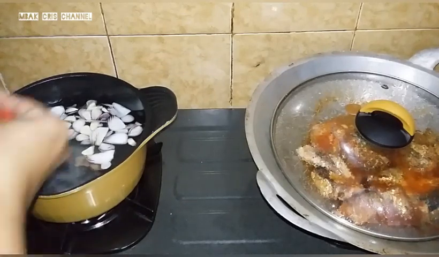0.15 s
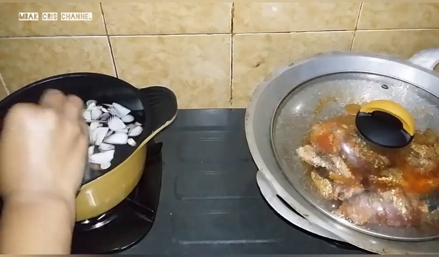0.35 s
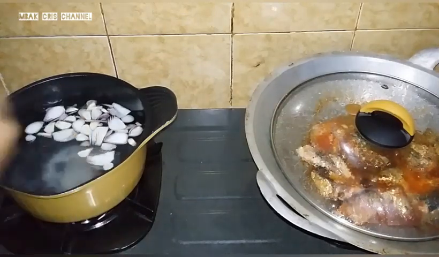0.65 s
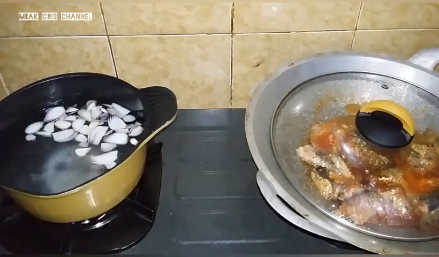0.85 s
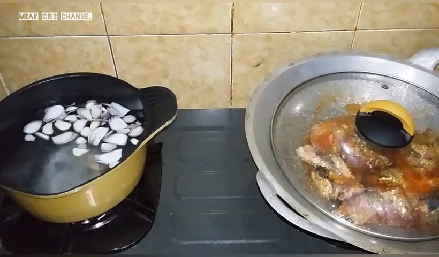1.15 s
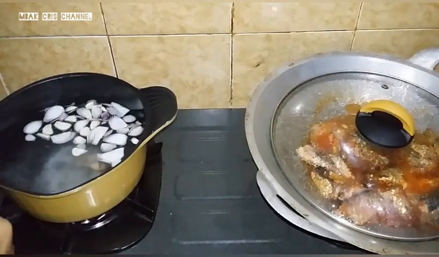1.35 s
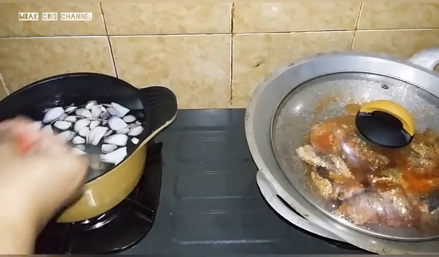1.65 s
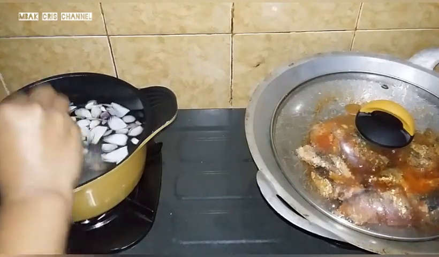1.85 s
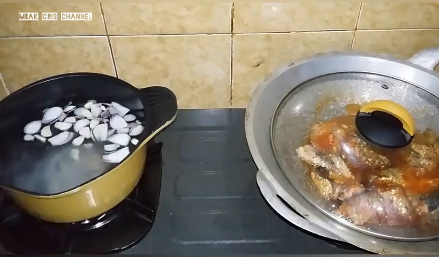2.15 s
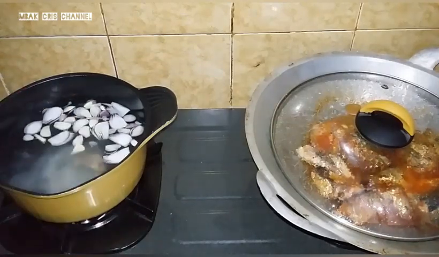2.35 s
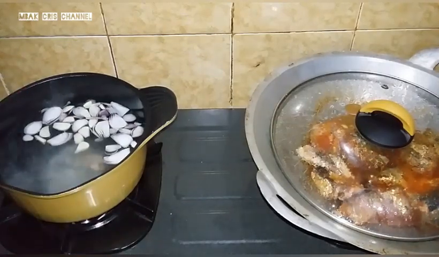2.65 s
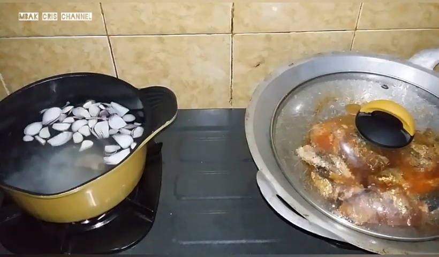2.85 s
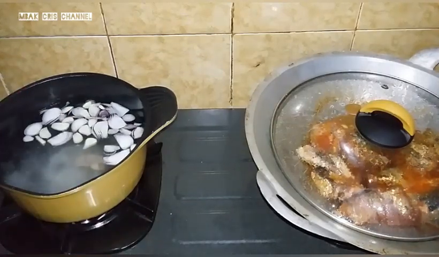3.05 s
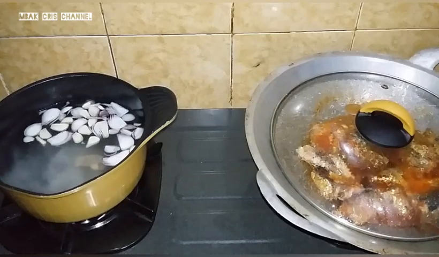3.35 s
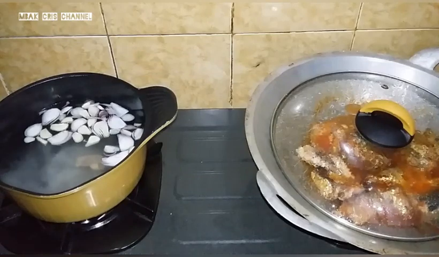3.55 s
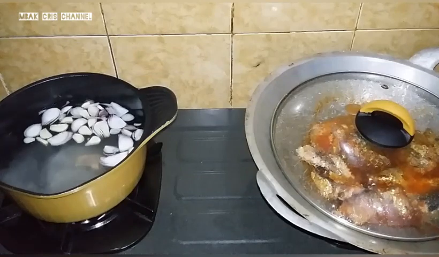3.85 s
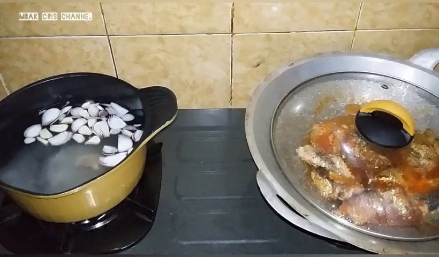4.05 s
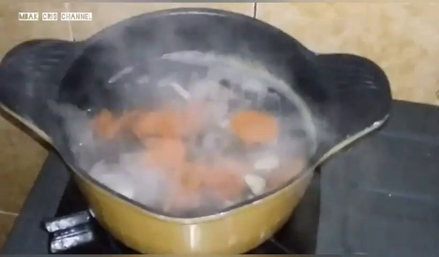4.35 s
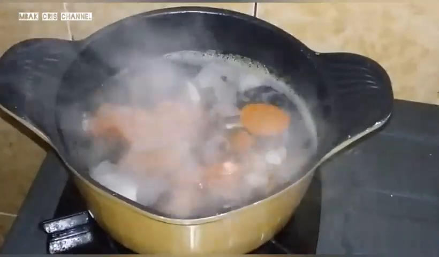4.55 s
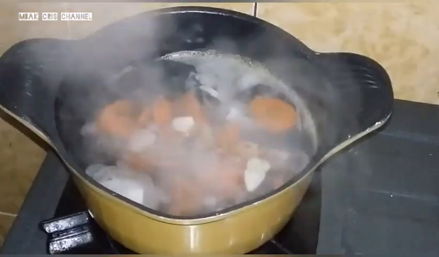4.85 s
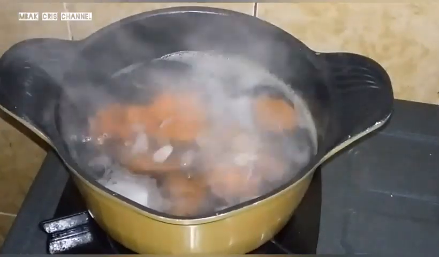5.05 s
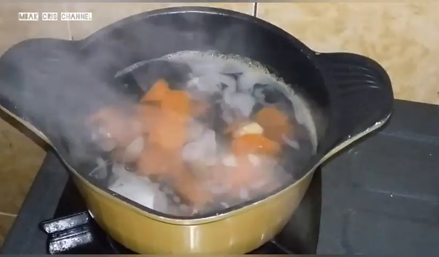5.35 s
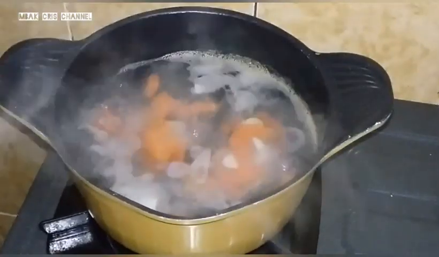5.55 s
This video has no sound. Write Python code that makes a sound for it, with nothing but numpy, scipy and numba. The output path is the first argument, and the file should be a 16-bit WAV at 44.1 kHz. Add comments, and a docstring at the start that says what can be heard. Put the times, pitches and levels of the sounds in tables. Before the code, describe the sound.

In a home kitchen, a lidded pan fries with a dense bright sizzle, low bubbling drone and sharp oil spits. A hand clatters at the neighbouring pot, most busily midway. A fluttering steam jet bursts out and everything cuts to silence. A much fainter simmer fades in, then something scrapes and knocks on the counter. One close microphone, mono, slightly dull at the very top.

```python
"""A dense frying sizzle over the drone of pan and glass lid, with spits of oil, a hand clattering at the
next pot and a rising jet of steam; it cuts to silence. Then a simmering pot fades in, a faint hiss, until
something is dragged and knocked down on the counter. Coloured noise bands and sliding damped sines make
the liquids and the drag; banks of decaying modes make the blows; a thin whine sits at the very top."""
import sys
import numpy as np
from scipy import signal
from scipy.fft import rfft, irfft, next_fast_len
from scipy.io import wavfile
from scipy.ndimage import uniform_filter1d
from numba import njit

SR = 44100
rng = np.random.default_rng(int(sys.argv[2]) if len(sys.argv) > 2 else 0)


def generate_wav(signal):
    """Clip the signal to [-1, 1] and save it as 16-bit WAV at the path in sys.argv[1]."""
    frames = np.transpose(np.atleast_2d(signal))
    scaled = np.clip(frames, -1, 1) * 32767
    pcm = np.round(scaled).astype(np.int16)
    wavfile.write(sys.argv[1], SR, pcm)


N = 251057
TIME = np.arange(N) / SR
SIZE = next_fast_len(N)
FREQ = np.arange(SIZE // 2 + 1) * SR / SIZE + 1e-3  # Hz, offset so that log is finite


def undb(db):
    """Decibels to gain."""
    return 10 ** (np.asarray(db, float) / 20)


def unit(x):
    """Scale to rms 1."""
    return x / np.sqrt(np.mean(x ** 2))


def walk(rate_hz):
    """Random levels held 1 / rate_hz seconds and slewed twice; rms 1."""
    hold = max(int(SR / rate_hz), 1)
    steps = np.repeat(rng.standard_normal(N // hold + 1), hold)
    slewed = uniform_filter1d(uniform_filter1d(steps, hold), hold)
    return unit(slewed[:N])


def ramp(start_s, length_s):
    """0 before start_s, then a straight rise to 1 over length_s."""
    return np.clip((TIME - start_s) / length_s, 0, 1)


def filtered(x, gain):
    """Apply a gain per frequency."""
    return irfft(rfft(x, SIZE) * gain, SIZE)[:N]


def colour(points, peaks=()):
    """Gain at every frequency from (Hz, dB) points, lifted by resonances (Hz, width Hz, dB)."""
    hz, db = np.transpose(points)
    lift = 1
    for peak_hz, width_hz, peak_db in peaks:
        lift = lift + undb(peak_db) ** 2 / (1 + (2 * (FREQ - peak_hz) / width_hz) ** 2)
    return undb(np.interp(np.log(FREQ), np.log(hz), db, -90, -90)) * np.sqrt(lift)


def hiss(gain, swell_db=0., patch_db=0., patch_rate_hz=30.):
    """Half-octave-spaced noise bands that swell together, in patches shared with their neighbours; rms 1."""
    out, swell = np.zeros(N), swell_db * walk(7.5)
    shared = walk(patch_rate_hz)
    for centre_hz in 21 * 2 ** np.arange(0, 10.1, .5):
        band = gain * np.cos(np.pi * np.clip(np.log2(FREQ / centre_hz), -.5, .5))
        if band.max() > 1e-3:  # skip inaudible bands
            shared = (shared + walk(patch_rate_hz)) / np.sqrt(2)
            out += undb(swell + patch_db * shared) * filtered(rng.standard_normal(N), band)
    return unit(out)


@njit
def burst(start, hz, cycles, size, glide, count):
    """Each bubble is a damped sine that slides up in pitch as it nears the surface."""
    out = np.zeros(count)
    for k in range(len(start)):
        span = cycles[k] * SR / hz[k]  # samples
        z = size[k] + 0j
        step = np.exp(2j * np.pi * hz[k] / SR - 3 / span)
        bend = np.exp(2j * np.pi * hz[k] / SR * glide / span)
        for i in range(start[k], min(start[k] + int(span), count)):
            out[i] += z.imag
            z, step = z * step, step * bend
    return out


def bubbles(gain, rate_hz, lo_hz, hi_hz, mean_cycles, spread_db, glide):
    """Bubbles of random pitch, length and capped level at random moments, in their vessel's colour; rms 1."""
    moment, pitch, level, length = rng.random((int(rate_hz * N / SR), 4)).T
    hz = lo_hz * (hi_hz / lo_hz) ** pitch
    # factor hz: equal energy per hertz before colouring
    size = hz * undb(spread_db * np.minimum(-np.log(1 - level), 3))
    start = (moment * N).astype(np.int64)
    raw = burst(start, hz, mean_cycles * (.5 + length), size, glide, N)
    return unit(filtered(raw, gain))


def ring(hits, modes, detune, sag=0., sag_s=.03):
    """Each blow rings the modes near its pitch most; a softer contact rings fewer and builds more slowly.
    A loose panel (sag > 0) drops in pitch under a hard blow and climbs back."""
    reach_octaves, reach_slope = 0.2, 0.38  # spread of modes at a 10 ms push; a shorter push rings more
    out, t = np.zeros(N + SR), np.arange(SR // 2) / SR
    chance = rng.standard_normal((len(hits), len(modes)))
    for (start_s, peak_db, hit_hz, push_s, stretch), slips in zip(hits, chance):
        sound = 0
        reach = reach_octaves * (100 * push_s) ** -reach_slope
        bent = t - sag * undb(peak_db) * sag_s * (1 - np.exp(-t / sag_s))
        for (mode_hz, mode_db, t60_s), slip in zip(modes, slips):
            near = np.exp(-.5 * (np.log2(mode_hz / hit_hz) / reach) ** 2)
            tone = np.sin(2 * np.pi * mode_hz * (1 + detune * slip) * bent)
            sound = sound + near * undb(mode_db) * tone * 1000 ** (-t / t60_s / stretch)
        sound = sound * np.sin(np.pi / 2 * np.minimum(t / push_s, 1)) ** 2
        i = int(start_s * SR)
        out[i:i + len(t)] += undb(peak_db) * sound / np.abs(sound).max()
    return out[:N]


def whine():
    """A thin steady band of noise at the very top."""
    centre_hz, width_hz, level_db = 15600, 132, -68.5
    band = 1 / (1 + (2 * (FREQ - centre_hz) / width_hz) ** 2)
    return undb(level_db) * unit(filtered(rng.standard_normal(N), band))


def simmer():
    """Water simmering further off: a smooth hiss over a wavering low murmur of bubbles."""
    # Each row: frequency in Hz, relative level in dB per Hz.
    simmer_colour = [(18, -42), (42, -18), (56, -0.5), (75, -6.5), (105, -3.5), (150, -1.5), (190, -7),
                     (235, 1.5), (290, 0), (360, -6.5), (500, -7), (780, -12.5), (1200, -15), (3500, -18.5),
                     (5200, -18), (6400, -15), (7500, -18), (10000, -27.5), (15900, -31.5)]
    level_db = -43
    tone = colour(simmer_colour)
    murmur = bubbles(tone, rate_hz=110., lo_hz=101., hi_hz=694., mean_cycles=14., spread_db=-2., glide=.054)
    steam = hiss(tone, patch_db=.3, patch_rate_hz=25.)
    return undb(level_db) * (steam + undb(-19.0) * murmur)


def shoves(column, dies_s, t60_s):
    """Gain of one layer: each shove along the counter builds, dies quickly and leaves an echo."""
    # Each row: start in seconds, rise in seconds, rasp level in dB, rumble level in dB.
    shove_rows = [(5.27, .03, -50.5, -46), (5.465, 0.0023, -28.5, -33), (5.478, 0.0029, -22.5, -32.5),
                  (5.490, 0.019, -27.5, -33), (5.503, 0.017, -19.5, -27.5), (5.511, .005, -26, -35)]
    echo_db = -5  # the kitchen rings on
    power = 0
    for row in shove_rows:
        start_s, rise_s = row[:2]
        after = np.maximum(TIME - start_s - rise_s, 0)
        tail = np.exp(-2 * after / dies_s) + undb(echo_db) ** 2 * 1000 ** (-2 * after / t60_s)
        power = power + (undb(row[column]) * ramp(start_s, rise_s)) ** 2 * tail
    return np.sqrt(power)


def drag():
    """Something dragged on the counter: gritty rasp of noise and short bursts over a low rumble."""
    # Rasp, then rumble. Each row: frequency in Hz, relative level in dB per Hz.
    rasp_colour = [(710, -25), (1200, -14), (1250, -7), (1340, -7), (1490, -16), (2370, 0), (2550, -4.5),
                   (3600, -5.5), (5730, 1.5), (7660, -4), (15800, -30)]
    rumble_colour = [(30, -45), (70, -20), (130, -20), (230, -10), (330, -11.5), (520, -10), (860, -12.5),
                     (1200, -19), (1600, -17), (2100, -26)]
    tone = colour(rasp_colour)
    grit = bubbles(tone, rate_hz=900., lo_hz=1200., hi_hz=15900., mean_cycles=2.4, spread_db=4., glide=0.)
    rasp = hiss(tone, patch_db=1.0, patch_rate_hz=99.0) + undb(-16.0) * grit
    rumble = hiss(colour(rumble_colour), patch_db=1.0, patch_rate_hz=56.0)
    rasp_gain = shoves(column=2, dies_s=0.025, t60_s=0.37)
    rumble_gain = shoves(column=3, dies_s=0.046, t60_s=0.59)
    return rasp_gain * rasp + rumble_gain * rumble


def knock():
    """Blows that ring the modes of the counter, a loose panel."""
    # Each row: start in seconds, peak in dB, pitch most excited in Hz, push in seconds,
    # ring length as a multiple of each mode's t60 (under 1 damped, over 1 longer).
    blow_rows = [(5.295, -38, 298, .01, .9), (5.322, -37, 300, 0.0077, .9), (5.382, -33, 289, 0.011, 1.1),
                 (5.468, -23, 550, 0.013, 0.84), (5.483, -13, 220, 0.02, 0.35),
                 (5.490, -29, 517, 0.013, 1.1), (5.512, -18, 940, 0.0043, 1.1),
                 (5.520, -13, 215, 0.011, .9), (5.526, -23, 500, 0.0082, 0.97),
                 (5.549, -28, 245, 0.011, 0.46), (5.558, -31, 510, .006, 0.84), (5.559, -30, 870, .006, .8),
                 (5.574, -26.5, 240, 0.016, 1.3), (5.582, -39, 520, .005, .7),
                 (5.600, -28, 232, 0.023, 0.9), (5.652, -31.5, 250, 0.016, .5)]
    # Each row: mode in Hz, relative level in dB, t60 in seconds before that multiple.
    counter_modes = [(238.8, 0.5, 0.17), (288, 0.5, .07), (481, -5, 0.27), (519, -3, 0.23), (550, -4, 0.14),
                     (718, -7, 0.19), (860, -5.5, 0.17), (998, -8, 0.13), (1200, -2, 0.21), (1330, -9, .12)]
    return ring(blow_rows, counter_modes, detune=0.0074, sag=0.24, sag_s=0.046)


def clatter():
    """Hand and cup against the next pot, ringing its modes."""
    # Each row: start in seconds, peak in dB, pitch most excited in Hz, push in seconds,
    # ring length as a multiple of each mode's t60 (under 1 damped, over 1 longer).
    clatter_rows = [(.28, -32.5, 945, 0.037, 1.1), (.33, -30.5, 1080, 0.025, 1),
                    (.55, -38, 295, 0.066, 2.3), (.63, -33, 293, 0.058, 1.3),
                    (1.703, -29.5, 370, 0.013, .9), (1.84, -38, 170, .045, 1.7),
                    (2.210, -23, 870, 0.0027, 1.1), (2.226, -24, 1020, .0056, 1.4),
                    (2.238, -29, 855, .005, 0.8), (2.252, -29, 836, 0.0067, 1.1),
                    (2.266, -30, 480, 0.0043, 0.74), (2.305, -33, 690, .008, .9),
                    (2.320, -30, 720, .006, 0.61), (2.509, -28.5, 860, .006, 0.62),
                    (2.5595, -15, 860, 0.0026, .22), (2.567, -28, 430, .003, 0.49),
                    (2.571, -24, 950, .003, 0.27), (2.581, -22, 910, 0.006, 0.37),
                    (2.592, -24, 506, 0.0053, 0.44), (2.597, -13, 554, .011, 0.59),
                    (2.612, -17, 600, .003, 0.63), (2.626, -16, 460, 0.003, 0.84),
                    (2.630, -19, 398, .002, 0.36), (2.636, -24, 300, 0.0069, 1.5),
                    (2.648, -18, 423, 0.001, 0.49), (2.665, -23, 474, .005, 0.56),
                    (2.682, -27, 450, .004, 0.82), (2.731, -31.5, 830, .01, 0.55),
                    (2.79, -26.5, 826, .012, .7), (2.855, -26.5, 800, .015, 1.3),
                    (2.956, -27, 295, 0.008, 0.56), (3.098, -29, 296, .011, 0.67),
                    (3.222, -25, 804, 0.014, 0.88), (3.31, -27, 505, 0.011, 0.45),
                    (3.44, -27.5, 317, .009, 0.56)]
    # Each row: mode in Hz, relative level in dB, t60 in seconds before that multiple.
    pot_modes = [(168.5, 4, 0.089), (292.2, -3.5, 0.11), (360.5, -6, 0.16), (463, 5, 0.066),
                 (510, -3, 0.063), (579, 5.5, 0.084), (646, 4.5, 0.048), (839, 2, 0.057), (947, -3, 0.09),
                 (1060, 5.5, 0.041), (1305, 2, 0.085)]
    return ring(clatter_rows, pot_modes, detune=0.009)


def jet(width_hz=1100.0, flutter_db=2.1):
    """Steam noise in a narrow band whose centre climbs as the gap closes; it flutters and comes in puffs."""
    # Each row: centre in seconds, lift in dB.
    puff_rows = [(3.918, 5.5), (3.947, 0), (3.96, 5), (3.999, 4), (4.017, 9), (4.045, 15.5), (4.059, 6),
                 (4.075, 10.5), (4.088, 6), (4.118, 10), (4.135, 12), (4.146, 10), (4.166, -8)]
    puff_s = 0.0018
    start_s, rise_s, level_db = 3.89, 0.031, -37.5
    from_hz, to_hz, climb_s = 5600., 6840, 0.18
    soft = signal.butter(2, width_hz / 2, fs=SR, output="sos")
    a, b = signal.sosfilt(soft, rng.standard_normal((2, N)))
    hz = to_hz - (to_hz - from_hz) * np.exp(-np.maximum(TIME - start_s, 0) / climb_s)
    turn = 2 * np.pi * np.cumsum(hz) / SR
    steam = unit(a * np.cos(turn) + b * np.sin(turn))
    puffs_db = sum(db * np.exp(-.5 * ((TIME - s) / puff_s) ** 2) for s, db in puff_rows)
    return steam * ramp(start_s, rise_s) * undb(level_db + flutter_db * walk(160.) + puffs_db)


def spits(glide=.015, rough=.65):
    """Pockets of steam that burst: a brief ring, rising a little, roughened by spray."""
    # Each row: start in seconds, peak in dB, pitch in Hz.
    spit_rows = [(.150, -20, 4660), (.260, -23.5, 2620), (1.072, -20.5, 5800), (1.077, -24.5, 3950),
                 (1.113, -25, 2300), (1.116, -21, 2950), (1.117, -22.5, 3350), (1.119, -27, 2350),
                 (1.187, -27, 5190), (1.194, -31, 5400), (1.202, -29, 6330), (1.401, -22, 4050),
                 (1.745, -21, 6130), (1.824, -22.5, 2520), (1.826, -27, 2250), (1.96, -25, 2320),
                 (2.241, -20, 2260), (2.558, -29, 5460), (2.604, -26, 3480), (2.771, -25, 4010),
                 (2.909, -25, 4390), (3.252, -25, 7160), (3.538, -23, 3900), (3.84, -29, 4000),
                 (3.842, -33, 6900), (3.872, -26, 4050)]
    spit_s = 0.0084
    out, t = np.zeros(N), np.arange(SR // 20) / SR
    for start_s, peak_db, hz in spit_rows:
        spray = 1 + rough * unit(uniform_filter1d(rng.standard_normal(len(t)), size=16))
        tone = np.sin(2 * np.pi * hz * t * (1 + glide * (t / spit_s - .5)))
        pop = tone * spray * t * np.exp(-3 * t / spit_s)
        i = int(start_s * SR)
        out[i:i + len(t)] += undb(peak_db) * pop / np.abs(pop).max()
    return out


def swells(column):
    """Lift in dB of one frying layer, which swells or sags for a moment: rise, hold, fall."""
    # Each row: start in seconds, rise in seconds, hold in seconds, sizzle lift in dB, drone lift in dB.
    swell_rows = [(0, .001, 0.14, 0.5, 2), (2.206, 0.011, 0.08, 2.5, 2), (2.47, 0.045, .01, -0.5, -0.5),
                  (2.556, .045, 0.04, 2.5, 5), (3.862, 0.032, 0.046, 1.5, 1.5)]
    fall_s = 0.076
    lift_db = 0
    for row in swell_rows:
        shape = ramp(row[0], row[1]) - ramp(sum(row[:3]), fall_s)
        lift_db = lift_db + row[column] * shape
    return lift_db


def drone():
    """Low hiss and plopping bubbles, coloured by the pan and by the air resonating under the lid."""
    # Each row: frequency in Hz, relative level in dB per Hz.
    drone_colour = [(18, -29), (42, -17.5), (54, -12), (100, -12.5), (200, -7), (400, -7.5), (700, -6),
                    (1000, -10), (1300, -25), (1700, -23.5), (2200, -54)]
    # Each row: resonance in Hz, width in Hz, lift in dB.
    lid_peaks = [(121, 19, 8.5), (171, 11.8, 6.5), (270, 45, 5), (383, 40, 5.5), (455, 12, 4), (523, 19, 8),
                 (562, 12, 3.5), (664.4, 18, 10), (730, 37, 5), (821, 26.6, 11), (836, 29, 8),
                 (1074, 40, 5)]
    level_db = -36.5
    low = colour(drone_colour, lid_peaks)
    plops = bubbles(low, rate_hz=200., lo_hz=85.5, hi_hz=1836., mean_cycles=11.7, spread_db=2., glide=.05)
    bed = hiss(low, swell_db=.5, patch_db=0.5, patch_rate_hz=11.0)
    return undb(level_db + swells(column=4)) * (undb(-1.5) * bed + undb(-8.0) * plops)


def sizzle():
    """Frying oil: patchy hiss, long fizzing bubbles, snapping droplets and small spits."""
    # Each row: frequency in Hz, relative level in dB per Hz.
    sizzle_colour = [(650, -22), (1100, -2.5), (1300, -8.5), (1560, -10), (1850, -8), (2300, -2),
                     (2700, -2), (4000, -1.5), (6000, -1.5), (7000, -2), (9000, -12), (12000, -19),
                     (15200, -27), (15900, -28.5)]
    level_db = -33
    high = colour(sizzle_colour)
    fizz = bubbles(high, rate_hz=5000., lo_hz=900., hi_hz=15920., mean_cycles=60., spread_db=3.5, glide=.04)
    crackle = bubbles(high, rate_hz=900., lo_hz=1970., hi_hz=15900., mean_cycles=1.9, spread_db=4., glide=0.)
    pops = bubbles(high, rate_hz=60., lo_hz=2100., hi_hz=7500., mean_cycles=21., spread_db=2.5, glide=.02)
    bed = hiss(high, swell_db=0.15, patch_db=1.4, patch_rate_hz=60.)
    mix = undb(-1.5) * bed + undb(-3.5) * fizz + undb(-20.5) * crackle + undb(-14.5) * pops
    uneven = undb(0.25 * walk(45.))  # slight quick random unevenness in the level
    return undb(level_db + swells(column=3)) * mix * uneven


def scene():
    """Two moments at the stove: the first is cut off, the second fades in after a silence."""
    cut_s, cut_len_s = 4.175, 0.0059  # silent from cut_s on
    fade_s, fade_len_s = 4.42, 0.28
    first = np.clip((cut_s - TIME) / cut_len_s, 0, 1)
    second = ramp(fade_s, fade_len_s)
    frying = drone() + sizzle() + spits() + jet() + clatter()
    simmering = simmer() + drag() + knock()
    mono = first * frying + second * simmering + (first + second) * whine()
    return np.array([mono, mono])


def record(dry):
    """A single microphone with a steep cut at the top."""
    top_hz = 15870
    return signal.sosfilt(signal.ellip(14, .3, 90, top_hz, fs=SR, output="sos"), dry)


dry = scene()
out = record(dry)
generate_wav(out)
```